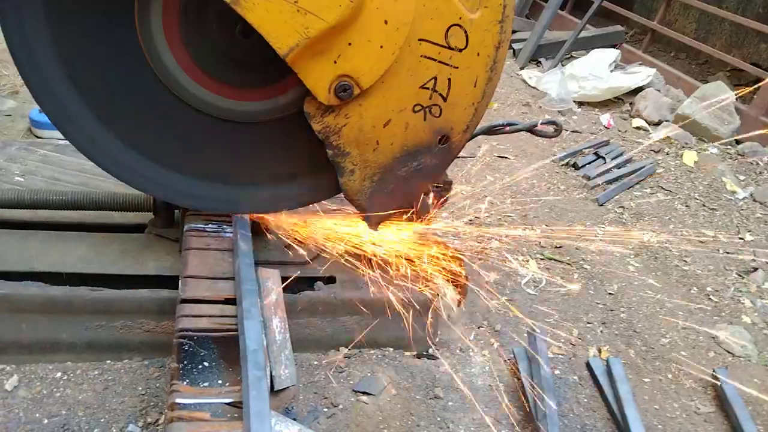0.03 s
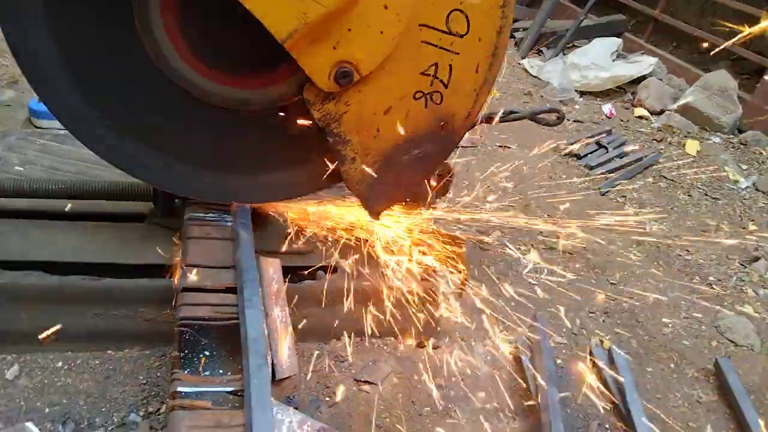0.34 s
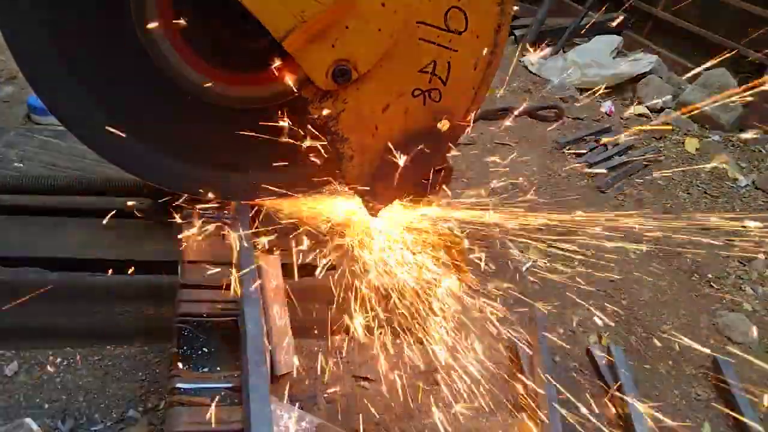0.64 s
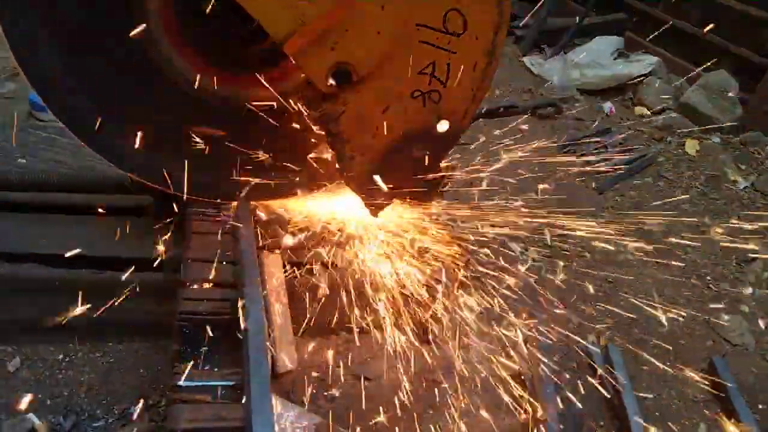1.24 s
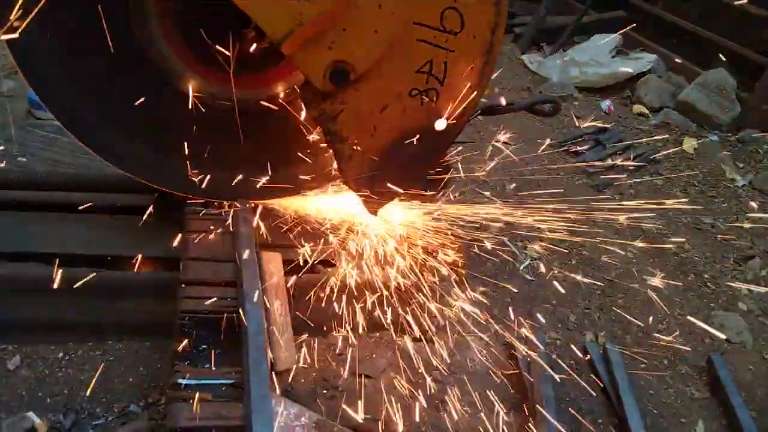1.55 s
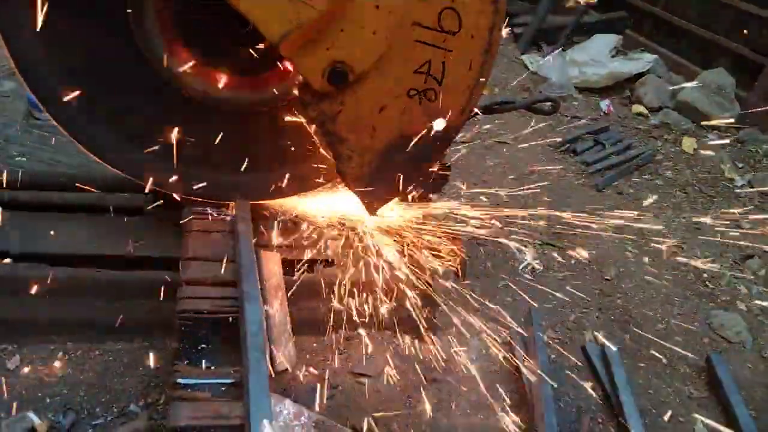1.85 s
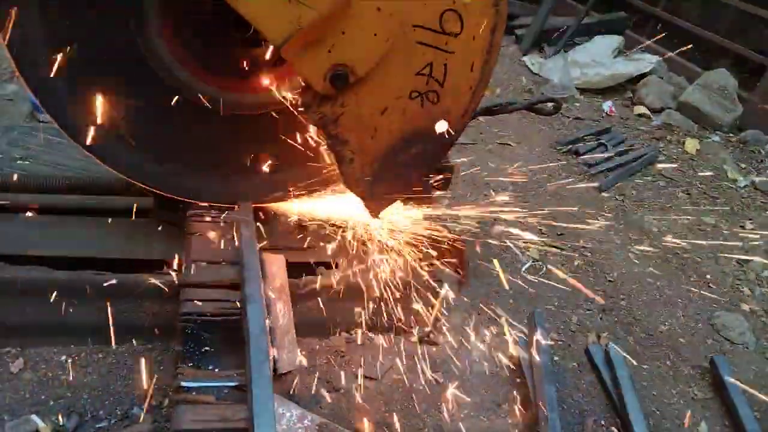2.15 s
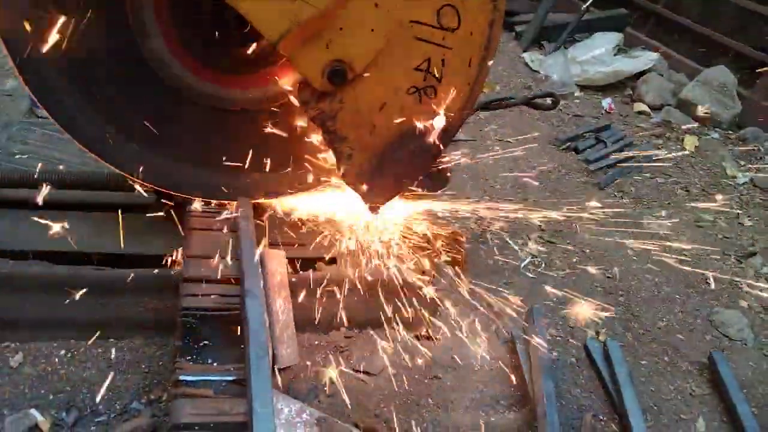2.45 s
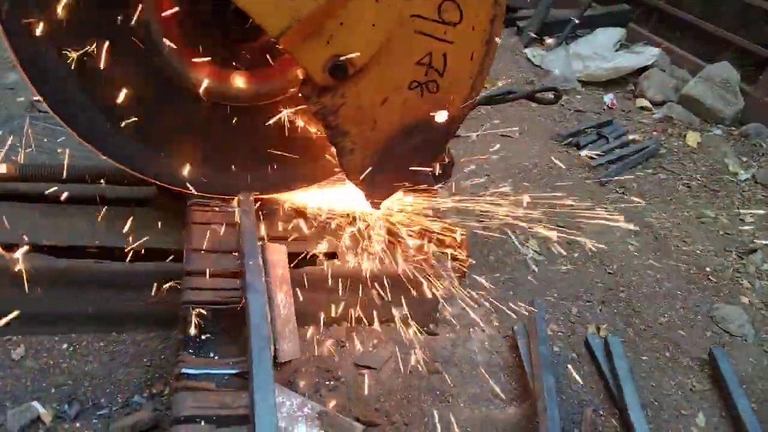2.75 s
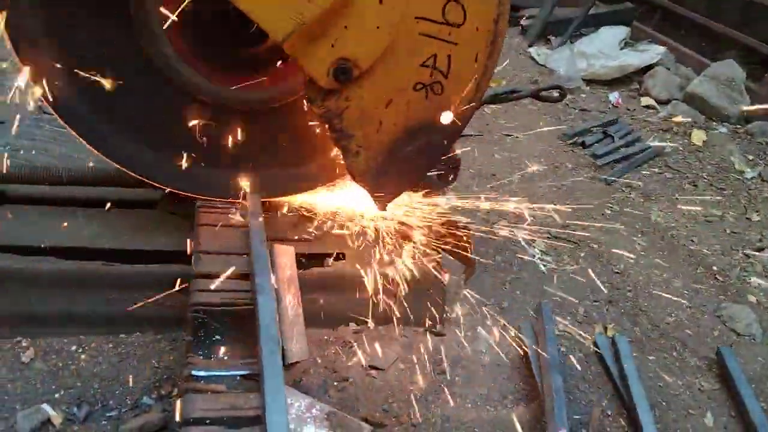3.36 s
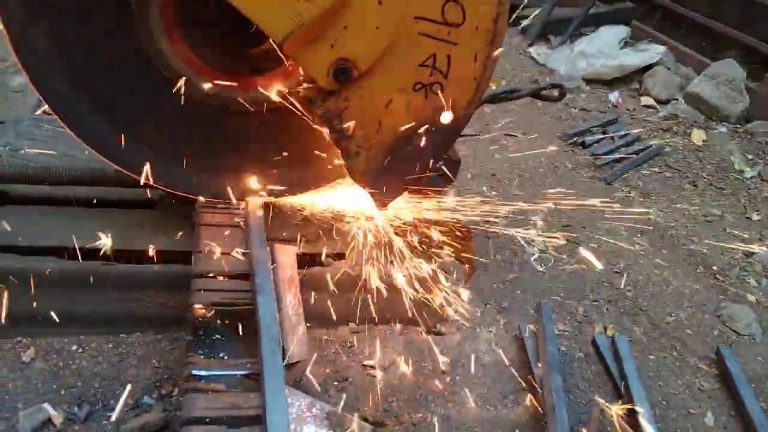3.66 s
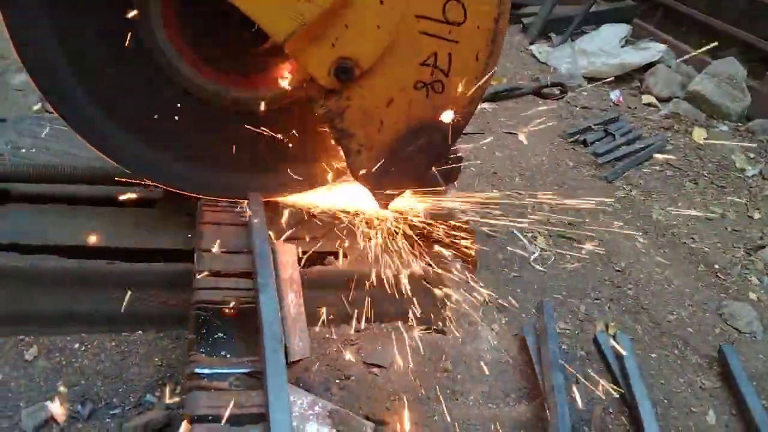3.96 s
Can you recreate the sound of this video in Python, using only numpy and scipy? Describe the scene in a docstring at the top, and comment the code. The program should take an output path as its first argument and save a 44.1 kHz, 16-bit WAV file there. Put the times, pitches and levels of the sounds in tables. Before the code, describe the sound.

An abrasive chop saw bites into a steel bar, close by and outdoors. After one sharp pop, it grinds steadily with a ringing roar, hissing sparks and brief whines, while the motor hums and slows under load.

```python
"""Outdoors, close by, an abrasive chop saw bites into a steel bar and slows as it is pressed down.
The grit on the rim drags through the cut, a force that partly repeats on every turn: it rings the
steel, shakes the frame and hisses with the sparks. Brief whines and singing tones come and go.
The labouring motor hums at twice the mains rate; one sharp pop comes just before the wheel bites fully."""
import sys
import numpy as np
from scipy import signal
from scipy.fft import rfft, irfft
from scipy.io import wavfile

SR = 44100
rng = np.random.default_rng(int(sys.argv[2]) if len(sys.argv) > 2 else 0)


def unload_wav(signal):
    """Save mono or channel-first audio to the path in sys.argv[1] as 16-bit WAV at rate SR, clipped to [-1, 1]."""
    wavfile.write(
        sys.argv[1],
        SR,
        np.round(np.clip(np.atleast_2d(signal).T, -1, 1) * 32767).astype(np.int16),
    )


N = 176400

# period of one turn of the wheel, longer under load: (time [s], period [ms])
TURN_PERIOD = [(.15, 18.8), (.45, 19.5), (.66, 20.6), (.88, 22), (1.19, 26.5), (1.46, 25.9), (1.65, 30.5),
               (1.86, 34.3), (2.22, 38.8), (2.44, 30.8), (2.63, 29.1), (3.03, 39.7), (3.18, 38.9),
               (3.5, 41.3), (3.82, 32.3), (4, 32.8)]


def steel_ring():
    """Forced vibration: the rim drives the resonances of the bar and guard."""
    # envelope of the ringing: (time [s], level [dB])
    envelope = [(0.17, -31), (0.23, -23.5), (0.33, -20), (0.37, -28.5), (0.43, -25), (0.47, -17.5),
                (0.75, -15.5), (1.14, -15.5), (1.18, -18), (1.42, -15.5), (1.68, -17.5), (2.48, -17.5),
                (2.51, -16), (2.65, -17.5), (2.75, -15.5), (3.19, -17.5), (3.29, -16.5), (4.0, -17)]
    # broad response of the steel: (frequency [Hz], relative level [dB])
    spectrum = [(600, -46), (970, -17), (1060, -2.5), (1400, -2), (1570, -2), (2000, -4), (2380, -1),
                (2650, -10), (3000, -20), (3600, -30.5), (6000, -58)]
    # modes of bar and guard: (frequency [Hz], width [Hz], lift [dB] at each of the four stages)
    modes = [(1280, 150, -2, 0.55, 2.3, 4.2), (1344, 38, 7, 5.9, 4.3, 2), (1446, 55, 5, 2.8, 7.3, 7.7),
             (1674, 50, -1, 4.2, 2.5, 10.7), (1810, 59, 10, 10, 6.3, 6.1), (2160, 33, 8.5, 7, 6.2, 7.7),
             (2280, 71, 7, 2, 1.9, 3.1), (2384, 29, 7, 7.6, 3.8, 6), (2540, 13, 16, 3.3, 4.6, 1),
             (2798, 82, 11, 6.5, 6.9, 8.1)]
    stages_s = (.35, .8, 2.2, 3.6)
    trim_db, flutter_db = 0.44, 0.24
    gain = from_db(trim_db + in_time(envelope) + flutter_db * drift(57))
    ringing = deepening_cut(rim_force(likeness=0.44), stages_s, [spectrum] * len(stages_s), modes)
    return gain * (ringing + wheel_whine() + steel_singing())


def frame_growl():
    """Structure-borne sound: the rim shakes the saw's frame and bench."""
    # envelope of the growl: (time [s], level [dB])
    envelope = [(0.17, -34), (0.36, -27), (0.38, -34), (0.46, -24.5), (1.12, -27), (1.32, -21),
                (1.69, -24.5), (1.72, -20.5), (2.06, -20.5), (2.57, -20.5), (2.75, -22), (3.41, -19.5),
                (3.47, -17.5), (4.0, -23.5)]
    # response of the frame in a shallow and a deep cut: (frequency [Hz], relative level [dB])
    shallow = [(25, -46), (80, -18), (130, -13.5), (200, -10), (280, -8.5), (335, -10.5), (420, -2),
               (520, 0), (680, -1.5), (800, -0.5), (950, -4), (1200, -19), (2000, -60)]
    deep = [(25, -43), (70, -39), (100, -18), (122, -18.5), (140, -18.5), (163, -9), (200, -3.5),
            (235, -12), (275, -7.5), (325, -18.5), (380, -2.5), (490, -5), (515, -3.5), (550, 0), (615, 0),
            (660, -8), (800, -3), (950, -8.5), (1200, -56), (2000, -62)]
    stages_s, trim_db = (0.66, 1.63), -0.18
    gain = from_db(trim_db + in_time(envelope))
    return gain * deepening_cut(rim_force(likeness=0.49), stages_s, [shallow, deep])


def spark_hiss():
    """Friction and impact noise: fine grit hisses, chips crackle, and the steel rings briefly after both."""
    # envelope of the hiss: (time [s], level [dB])
    envelope = [(.16, -33), (.18, -28.5), (.34, -23), (.36, -31.5), (.437, -24.5), (.457, -19.5),
                (.52, -22), (.62, -23), (1.1, -23.5), (1.21, -26.5), (1.33, -24.5), (1.55, -24),
                (2.03, -26.5), (2.15, -25), (2.3, -26), (2.7, -25.5), (3.16, -27), (3.84, -25.5),
                (4, -26.5)]
    # colour of the hiss in a shallow and a deep cut: (frequency [Hz], relative level [dB])
    shallow = [(1500, -34), (3000, -5.5), (3500, -7), (4000, -3), (4800, -4), (5550, 3), (6300, -2),
               (7200, -5), (8500, -3.5), (9700, -9), (11900, -12.5), (14000, -9), (15500, -6)]
    deep = [(1500, -40), (1760, -34), (3000, -6), (3590, -5.5), (4260, -5), (4690, -5.5), (5450, -0.5),
            (6340, -7.5), (6990, -2.5), (8180, -6.5), (8880, -7.5), (9650, -13), (11300, -12), (12400, -14),
            (14500, -9), (15500, -8)]
    # high modes at the cut: (frequency [Hz], width [Hz], lift [dB] at each of the three stages)
    modes = [(4038, 93, 2, 8.5, 8), (4397, 37, 0, 7, 9), (4580, 75, 1, 5.5, 2), (4880, 28, 0, 4, 5),
             (5340, 62, 4, 2, 3), (5920, 380, 1.5, 2.5, 1.5), (6680, 240, 7.5, 2, 1), (6880, 220, 5, 0, 4),
             (7760, 230, 6.5, -3, -2), (9850, 700, 4, 1, 0.5), (10950, 450, 2, 6.5, 0.5),
             (11650, 250, 1, -1, 5.5), (12900, 350, 5, 3.5, 0), (13700, 250, 3, -1, 0),
             (15040, 260, 7, -1, 0)]
    stages_s = (0.42, 1.08, 2.6)
    sparks_per_s, spread_db, crackle_db = 320, 4, -11.5
    tail_t60_s, tail_db = .08, -8
    trim_db, flutter_db = 0.42, 0.75
    chips = (rng.random(N) < sparks_per_s / SR) * rng.choice([-1, 1], N)
    chips = chips * from_db(spread_db * np.minimum(rng.exponential(1, N), 4))
    force = rim_force(likeness=0.31) + from_db(crackle_db) * rms_one(chips)
    age = np.arange(SR // 4) / SR
    tail = rng.standard_normal(len(age)) * from_db(-60 * age / tail_t60_s)  # dense, lightly damped modes
    force = force + from_db(tail_db) * rms_one(signal.fftconvolve(force, tail)[:N])
    gain = from_db(trim_db + in_time(envelope) + flutter_db * drift(62))
    return gain * deepening_cut(force, stages_s, [shallow, deep, deep], modes)


def steel_singing():
    """Self-excited vibration: the rubbing wheel locks onto a resonance, which swells, wavers and fades."""
    # singing tones: (peak time [s], half length [s], frequency [Hz], level re the ringing [dB])
    tones = [(.73, .06, 1337, -7), (1.37, .1, 1428, -8), (2.83, .15, 2160, -11), (3.1, .2, 1458, -10),
             (3.52, .13, 1664, -7.5), (3.7, .2, 2153, -11.5), (3.85, .2, 1319, -10.5),
             (3.88, .17, 1674, -8)]
    waver_db, waver_rad = 2.5, .7
    t = np.arange(N) / SR
    out = 0
    for peak_s, half_s, hz, db in tones:
        swell = np.exp(-((t - peak_s) / half_s) ** 2) * from_db(db + waver_db * drift(8))
        out = out + swell * np.sin(2 * np.pi * hz * t + waver_rad * drift(6.5))
    return out


def wheel_whine():
    """Rotational orders: brief tones sink and rise in proportion to the speed of the wheel."""
    # whines: (peak time [s], half length [s], order [cycles per turn], level re the ringing [dB])
    whines = [(.8, .13, 43, -13), (.9, .3, 11.1, -17), (1.56, .13, 33, -8.5), (1.66, .14, 35, -11),
              (1.72, .27, 37.2, -6.5), (2.55, .17, 37.3, -5), (2.56, .13, 31.3, -11), (3.33, .12, 50, -8)]
    waver_db, waver_rad = 1.2, .3
    t = np.arange(N) / SR
    turns = np.cumsum(1000 / in_time(TURN_PERIOD)) / SR
    out = 0
    for peak_s, half_s, order, db in whines:
        swell = np.exp(-((t - peak_s) / half_s) ** 2) * from_db(db + waver_db * drift(9.6))
        out = out + swell * np.sin(2 * np.pi * order * turns + waver_rad * drift(5.5))
    return out


def motor_hum():
    """Magnetic force pulses at twice the mains rate; the hum and its octave swell as the motor labours."""
    # envelopes of the hum and of its octave: (time [s], level [dB])
    hum = [(.7, -65), (.85, -42.5), (1.5, -38.5), (1.7, -33), (1.76, -41.5), (2.248, -34.5), (2.78, -40),
           (3.1, -36), (3.55, -35.5), (4, -40.5)]
    octave = [(.3, -55), (0.5, -45.5), (1.0, -57), (1.2, -33), (1.44, -28.5), (1.46, -36), (1.67, -48),
              (1.78, -25), (1.83, -33.5), (2.58, -25), (2.66, -36), (2.81, -28), (3.01, -29), (3.14, -23),
              (3.23, -34), (3.52, -23.5), (4.0, -37.5)]
    hum_hz, waver_db, waver_rad = 100, 1.0, 0.13
    phase = 2 * np.pi * hum_hz * np.arange(N) / SR
    out = 0
    for harmonic, trim_db, envelope in ((1, 1.5, hum), (2, 3.5, octave)):
        gain = from_db(trim_db + in_time(envelope) + waver_db * drift(2.6))
        out = out + gain * np.sin(harmonic * phase + waver_rad * drift(7.6))
    return out


def pop():
    """Impulse: a one-sided pulse makes a dry snap, perhaps a chip hitting the microphone."""
    onset_s, decay_s, band_hz = .3574, 0.0005, [90, 3500]
    age = np.arange(N) / SR - onset_s
    pulse = .85 * (age >= 0) * np.exp(-np.abs(age) / decay_s) + 1e-18
    return signal.sosfilt(signal.butter(2, band_hz, "band", fs=SR, output="sos"), pulse)


def rim_force(likeness, grains=1800):
    """Quasi-periodic excitation: grit passes the cut; each turn wears some away and bares new grains."""
    spread_db = 3.0
    turn_s = in_time(TURN_PERIOD) / 1000
    turns = np.cumsum(1 / turn_s) / SR
    shape = (int(turns[-1]) + 20, grains)  # one row a turn
    fresh = rng.standard_normal(shape) * from_db(spread_db * rng.standard_normal(shape))
    # likeness is the correlation of the grit from one turn to the next
    grit = signal.lfilter([1], [1, -likeness], fresh, axis=0)[10:].ravel()
    passed = np.interp(turns * grains, np.arange(grit.size), np.cumsum(grit))
    grit_per_sample = np.diff(passed, prepend=passed[0])
    return rms_one(grit_per_sample * np.sqrt(turn_s))


def deepening_cut(force, stages_s, spectra, modes=()):
    """Time-varying response: each stage fades into the next as the wheel sinks into the bar."""
    out = 0
    for k, spectrum in enumerate(spectra):
        share = np.interp(np.arange(N) / SR, stages_s, np.eye(len(spectra))[k])
        stage_modes = [(hz, width, lifts[k]) for hz, width, *lifts in modes]
        out = out + share * resonant_body(force, spectrum, stage_modes)
    return out


def resonant_body(force, spectrum, modes):
    """Linear filtering: a broad response with resonance peaks colours the force; unit power out."""
    hz = np.maximum(np.arange(N // 2 + 1) * SR / N, 1)
    points = np.array(spectrum)
    db = np.interp(np.log(hz), np.log(points[:, 0]), points[:, 1])
    for centre, width, lift in modes:
        db = db + lift / (1 + (2 * (hz - centre) / width) ** 2)
    return rms_one(irfft(rfft(force) * from_db(db), N))


def drift(rate_hz):
    """Random modulation: low-passed noise wanders with a spread of about 1."""
    hop = 40  # samples per noise value
    pole = np.exp(-2 * np.pi * hop * rate_hz / SR)
    noise = rng.standard_normal(N // hop + 2002)
    slow = signal.lfilter([1], [1, -2 * pole, pole * pole], noise)[2000:]
    return np.interp(np.arange(N) / hop, np.arange(len(slow)), rms_one(slow))


def in_time(rows):
    """Linear interpolation: a curve's value at every sample."""
    return np.interp(np.arange(N) / SR, *np.transpose(rows))


def from_db(db):
    """Decibel law: level to amplitude ratio."""
    return 10 ** (np.asarray(db) / 20)


def rms_one(x):
    """Normalisation to unit power."""
    return x / np.sqrt(np.mean(x ** 2) + 1e-20)


def scene():
    """Superposition: the saw's sounds start abruptly together and add up in the centre."""
    touch_s, rise_s = 0.1554, 0.003
    onset = np.clip((np.arange(N) / SR - touch_s) / rise_s, 0, 1)
    saw = onset * (frame_growl() + steel_ring() + spark_hiss() + motor_hum()) + pop()
    return np.stack([saw, saw])


def record(dry):
    """Band limiting and saturation: the microphone loses deep bass, peaks are rounded, the top is cut."""
    low_hz, top_hz, ceiling = 42, 15550, 1.2
    heard = signal.sosfilt(signal.butter(2, low_hz, "high", fs=SR, output="sos"), dry)
    rounded = ceiling * np.tanh(heard / ceiling)
    return signal.sosfilt(signal.ellip(12, .1, 80, top_hz, fs=SR, output="sos"), rounded)


dry = scene()
out = record(dry)
unload_wav(out)
```